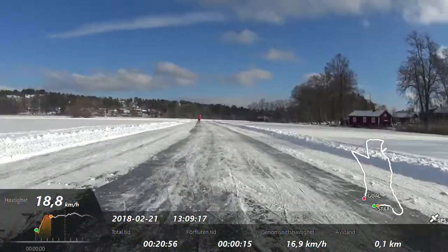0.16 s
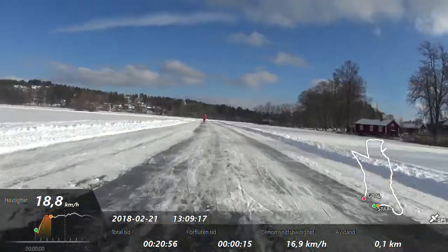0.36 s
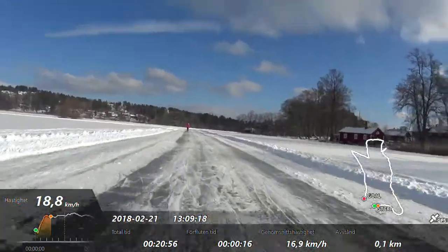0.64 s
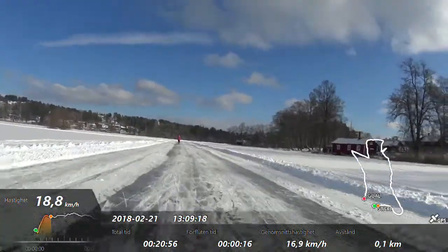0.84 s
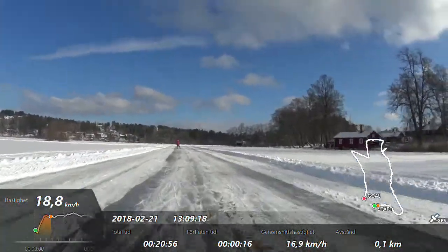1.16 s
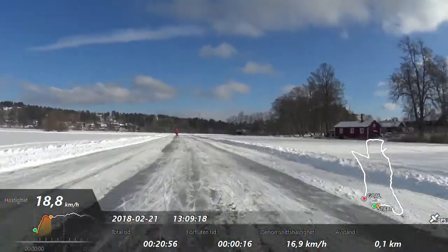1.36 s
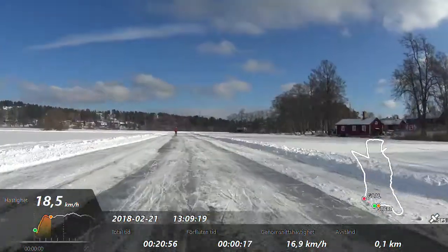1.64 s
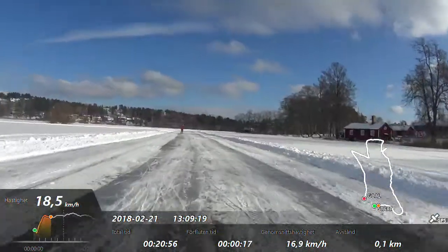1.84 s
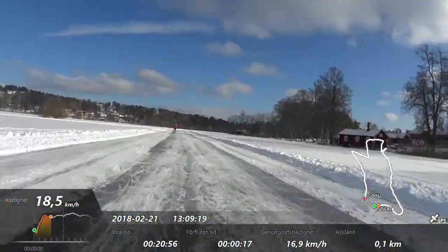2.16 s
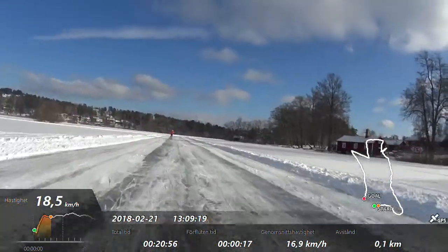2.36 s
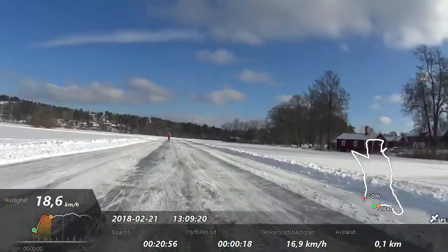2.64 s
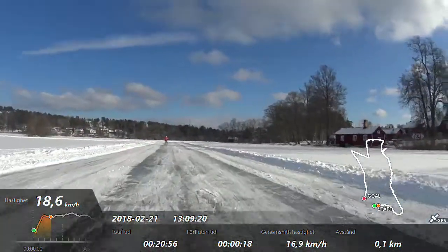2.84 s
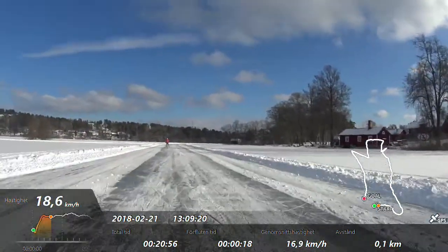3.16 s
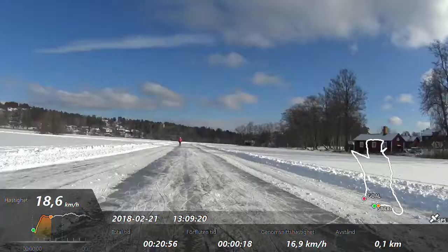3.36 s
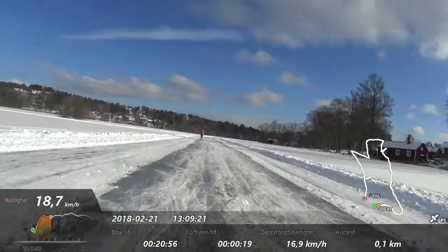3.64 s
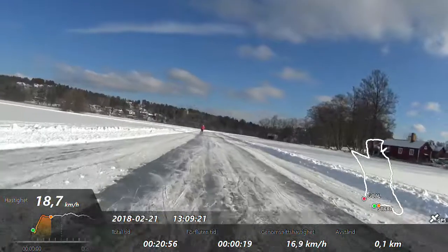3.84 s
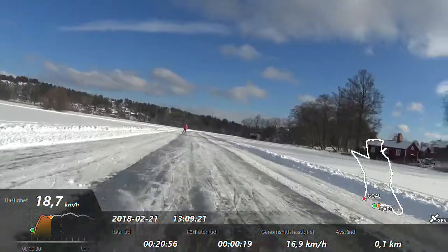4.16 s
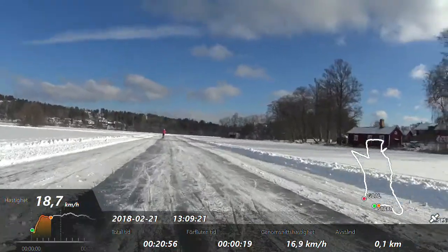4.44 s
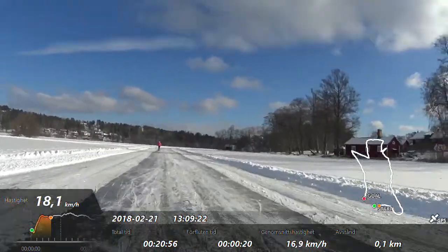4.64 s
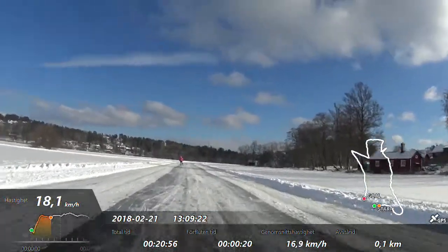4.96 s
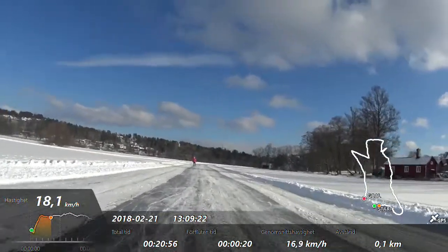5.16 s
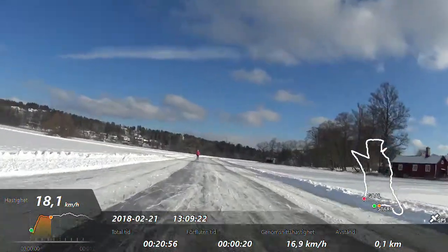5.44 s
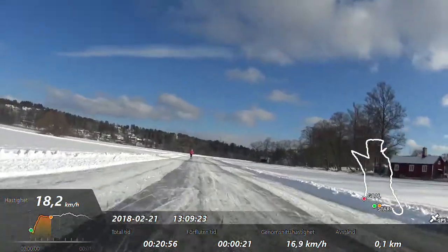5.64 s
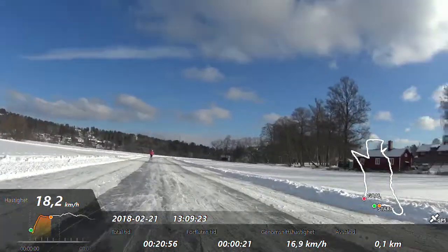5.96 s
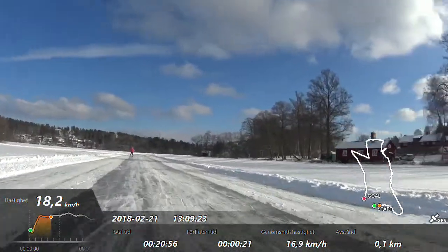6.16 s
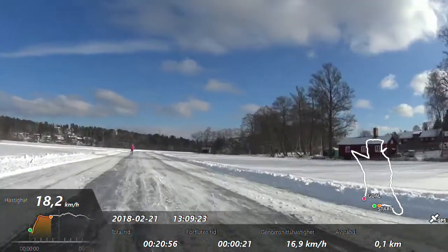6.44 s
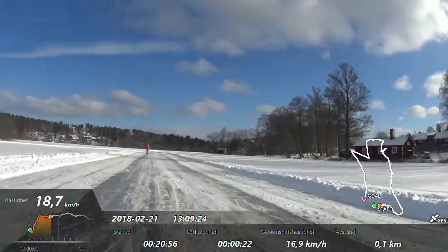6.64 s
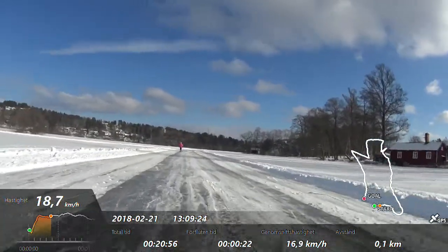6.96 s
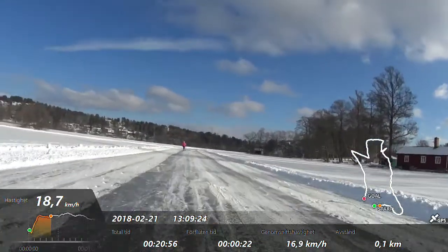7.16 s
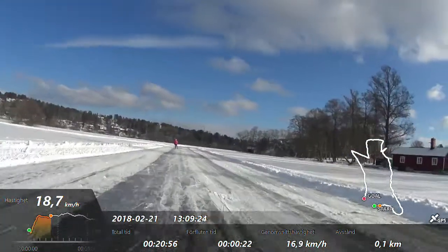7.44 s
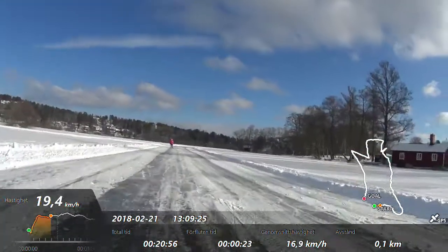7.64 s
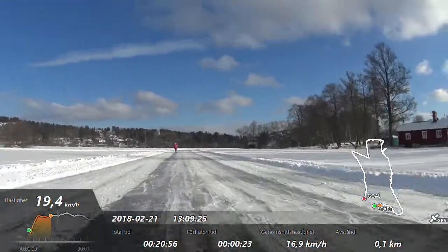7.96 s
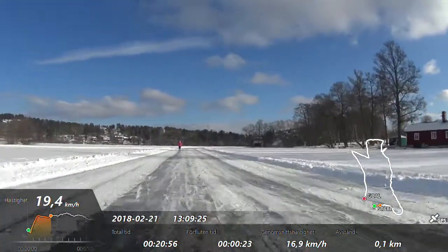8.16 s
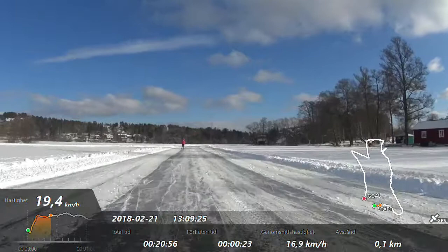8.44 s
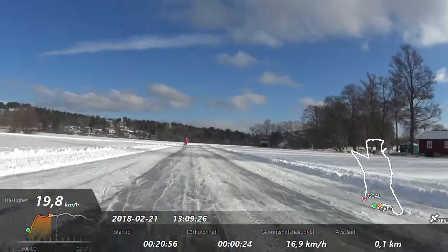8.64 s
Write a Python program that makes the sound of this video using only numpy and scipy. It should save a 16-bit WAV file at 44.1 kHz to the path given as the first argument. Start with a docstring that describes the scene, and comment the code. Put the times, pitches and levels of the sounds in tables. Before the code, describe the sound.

A skater strides steadily across a frozen lake, each blade chattering down, then gliding with a gritty hiss, clacking over ridges in a faint breeze.

```python
"""On a frozen lake, a skater glides at a steady stride with a small camera, one stroke about every 0.85 s.
Each long blade lands with a chatter of shrinking bounces, then hisses in bands of filtered ice clicks.
Rough patches add dense bursts of clicks; ridges give short decaying tones, hollow clunks and noisy chips.
Filtered noise makes the air that buffets two microphone ports, and a limiter flattens the hardest knocks."""
import sys
import numpy as np
from scipy import signal
from scipy.fft import rfft, irfft
from scipy.io import wavfile
from scipy.ndimage import uniform_filter1d, minimum_filter1d

SR = 44100
rng = np.random.default_rng(int(sys.argv[2]) if len(sys.argv) > 2 else 0)


def store_pcm(level_fs):
    """Save levels as 16-bit WAV."""
    pcm = np.round(np.clip(level_fs, -1, 1) * 32767).astype(np.int16)
    wavfile.write(sys.argv[1], SR, np.atleast_2d(pcm).T)


N = 387638
TIME = np.arange(N) / SR
BINS = np.fft.rfftfreq(N, 1 / SR)  # frequencies in Hz

# strokes, left and right skate in turn; the blade chatters until it bears the weight:
# (touch-down [s], chatter length [s], relative chatter level [dB], basic chatter pitch [Hz],
#  extra bite under full weight [dB], treble over body under full weight, before scaling [dB])
STROKES = [(0.201, 0.059, -38, 2350, 3.5, 1.5), (1.03, .13, -26, 2000, 6, -0.5),
           (1.885, 0.051, -27, 2190, 5, 3.5), (2.653, 0.099, -26, 2190, 2.5, -1.5),
           (3.509, 0.047, -29, 2250, 3.5, -2.5), (4.351, 0.082, -24.5, 2100, 3.5, -0.5),
           (5.144, 0.054, -27.5, 2230, 0.5, 0), (6.036, .115, -26.5, 2150, 6.5, -0.5),
           (6.887, 0.056, -29.5, 2220, 3, -1), (7.795, 0.042, -25, 2030, 3, -1.5),
           (8.62, 0.044, -29, 2150, 3, 0.5)]
# colour of ice broken by a scraping blade: (frequency [Hz], relative level per Hz [dB])
SCRAPE = [(150, -12), (500, -9.5), (850, -5.5), (1050, -13), (1350, 1), (1680, 1), (1950, 1), (2250, 6),
          (3100, -6), (4300, -1.5), (5500, -5.5), (6400, -7.5), (7400, -19.5), (11000, -23)]
# colour of air streaming past the camera: (frequency [Hz], relative level per Hz [dB])
WIND = [(15, -3.5), (30, -2.5), (75, 0), (130, -4), (220, -5), (350, -10), (600, -18.5), (1500, -45)]


def gain_of(db):
    """Turns decibels into an amplitude factor."""
    return 10 ** (np.asarray(db) / 20)


def evened(x):
    """Scales a signal to an rms (average strength) of 1."""
    return x / np.sqrt(np.mean(x ** 2) + 1e-20)


def read(points):
    """Reads a table at every frequency bin, in straight lines over log frequency."""
    hz, value = np.transpose(points)
    return np.interp(np.log(BINS + 1), np.log(hz), value)


def coloured(x, spectrum):
    """Filters by a spectrum in dB; white noise keeps its power."""
    return irfft(rfft(x) * evened(gain_of(read(spectrum))), N)


def add(mix, s, sound):
    """Mixes a sound in at time s (seconds)."""
    part = mix[max(round(s * SR), 0):][:len(sound)]
    part += sound[:len(part)]


def wander(rate_hz):
    """Slow random drift of rms 1, with its extremes rounded off."""
    slow = rfft(rng.standard_normal(N)) * np.exp(-(BINS / rate_hz) ** 2)
    return evened(np.tanh(evened(irfft(slow, N)) / 2))


def swell(depth_db, rate_hz):
    """Random rise and fall of loudness, as a gain of rms 1."""
    return evened(gain_of(depth_db * wander(rate_hz)))


def gates(rows, edge, tail):
    """Opens a level curve for each (start s, length s, level dB), with soft edges and a short tail (s)."""
    out = np.zeros(N)
    for s, length, db in rows:
        add(out, s - tail / 2, np.full(max(round(length * SR), 1), gain_of(db)))
    softened = uniform_filter1d(out, max(round(edge * SR), 1))
    keep = np.exp(-1 / (tail * SR))
    return signal.lfilter([1 - keep], [1, -keep], softened)


def fractures(per_s, spread_db):
    """Tiny breaks in the ice: random clicks of uneven size, together of rms 1."""
    size = gain_of(spread_db * np.minimum(rng.exponential(1, N), 4))
    return evened(rng.standard_normal(N) * size * (rng.random(N) < per_s / SR))


def splintered(x, patchy_db):
    """Gives chips of ice their own colours: random patches about 10 ms long and 700 Hz wide."""
    z = signal.stft(x, nperseg=256, noverlap=192)[2]
    patches = uniform_filter1d(rng.standard_normal(z.shape), size=4, axis=0)
    patches = uniform_filter1d(patches, size=7, axis=1)
    z = z * evened(gain_of(patchy_db * evened(patches)))
    return signal.istft(z, nperseg=256, noverlap=192)[1][:N]


def blow(hz, rise, turn):
    """A tone whose envelope swells to 1 at the rise time (s), then dies away; turn is its starting phase."""
    t = np.arange(SR // 40) / SR
    envelope = t / rise * np.exp(1 - t / rise)
    return envelope * np.sin(2 * np.pi * (hz * t + turn))


def bump(rise):
    """The bare envelope of a blow: no tone, just one push."""
    return blow(0, rise, 1 / 4)


def ringing(x, ring_db):
    """Adds the short ring of the blade's resonances to whatever strikes it."""
    # resonances of blade and binding: (pitch [Hz], relative level [dB], time to fall by 60 dB [s])
    blade_modes = [(900, -28, 0.04), (1250, -18, 0.032), (1573, -19, 0.029), (1694, -16.5, 0.03),
                   (2140, -13.5, 0.03), (2360, -14, 0.026), (2670, -20, 0.015), (4450, -31, .014)]
    t = np.arange(SR // 12) / SR
    modes = sum(gain_of(db - 60 * t / t60) * np.cos(2 * np.pi * hz * t) for hz, db, t60 in blade_modes)
    return x + gain_of(ring_db) * signal.oaconvolve(x, modes)[:N]


def swirls(level_db=-51, gust_db=4):
    """Small eddies of air that each port has to itself, as two separate noises."""
    noises = [coloured(rng.standard_normal(N) * swell(gust_db, rate_hz=20), WIND) for _ in range(2)]
    return gain_of(level_db) * np.array(noises)


def wind(level_db=4, gust_db=4.0, buffet_db=-1, push_db=1, push_hz=55):
    """A lumpy rumble of passing air; each strong eddy adds a low push and a burst of noise."""
    # relative strength of the head wind: (time [s], level [dB])
    breeze = [(0.0, -47), (0.83, -43.5), (1.15, -49.5), (1.93, -47), (2.42, -41), (2.71, -46), (6.22, -45),
              (6.93, -47.5), (7.12, -41), (8.79, -47.5)]
    # eddies that hit the microphone: (time [s], length [s], relative level [dB])
    buffets = [(0.218, 0.014, -19), (0.317, 0.025, -23.5), (0.474, 0.011, -28.5), (2.073, 0.034, -31),
               (2.51, 0.0082, -29), (5.446, 0.028, -29), (8.272, 0.0064, -29), (8.687, 0.017, -26.5),
               (8.744, 0.019, -23.5)]
    strength_db = level_db + np.interp(TIME, *np.transpose(breeze))
    steady = gain_of(strength_db) * swell(gust_db, rate_hz=21)
    eddies = gain_of(buffet_db) * gates(buffets, edge=0.0076, tail=0.002)
    pushes = np.zeros(N)
    for (s, _, db), turn in zip(buffets, rng.random(len(buffets))):
        add(pushes, s, gain_of(db + push_db) * blow(push_hz, 0.0025, turn))
    return pushes + coloured(rng.standard_normal(N) * (steady + eddies), WIND)


def weight(s):
    """Share of the skater's weight that presses on the ice around a touch-down at time s."""
    push_s, hold_s, ease_s = 0.17, 0.23, 0.2  # comes on before touch-down, stays, eases into the glide
    coming_on = 1 + (TIME - s) / push_s
    easing_off = 1 - (TIME - s - hold_s) / ease_s
    return np.clip(np.minimum(coming_on, easing_off), 0, 1)


def bite(free_db=-35.5, uneven_db=2.0):
    """How hard the edge bites (dB): it follows the weight of each stroke and wavers on uneven ice."""
    pressed_db = np.max([extra_db * weight(s) for s, _, _, _, extra_db, _ in STROKES], axis=0)
    return free_db + pressed_db + uneven_db * np.tanh(wander(rate_hz=5.3))


def lean(on_edge_db=1.5):
    """Treble over body (dB): it moves from the edge's balance to each stroke's own under the weight."""
    return on_edge_db + sum((flat_db - on_edge_db) * weight(s) for s, _, _, _, _, flat_db in STROKES)


def pebbling(bite_db, level_db=-33, per_s=60, spread_db=4, rise=0.000064, tick_db=-3, tick_rise=0.00021):
    """Many small bumps tap the blade and make it ring, louder when the edge bites."""
    sizes = gain_of(spread_db * np.minimum(rng.exponential(1, N), 3))
    sizes *= rng.random(N) < per_s / SR
    sizes *= gain_of(level_db + bite_db - np.median(bite_db))
    taps, ticks = np.zeros((2, N))
    at = np.flatnonzero(sizes)
    for i, (pitch, turn) in zip(at, rng.standard_normal((len(at), 2))):
        add(taps, i / SR, sizes[i] * blow(1650 * np.exp(.3 * pitch), rise, turn))
        add(ticks, i / SR, sizes[i] * gain_of(tick_db) * bump(tick_rise))
    return ringing(taps, ring_db=-11) + coloured(ticks * rng.standard_normal(N), SCRAPE)


def landing(level_db=1.0, grit_db=3.5, rise=0.0005, sag=0.14, scatter=0.11, uneven_db=6.0,
            boot_db=-8, boot_hz=1150, first_db=7):
    """The blade bounces ever faster; as the weight comes on its pitch sinks and grit and boot join in."""
    # colour of grit thrown up by a landing blade: (frequency [Hz], relative level per Hz [dB])
    grit_colour = [(150, -30), (600, -25), (900, 2), (1100, -9), (1550, -4), (2150, -11.5), (3000, 6.5),
                   (3600, -6.5), (4500, -2.5), (7000, -15.5), (11000, -29)]
    first_gap_s, last_gap_s = .013, 0.0033  # gaps between bounces shrink from the first towards the last
    settle_s = .1  # time scale over which the pitch sinks and the boot grows
    out = np.zeros(N)
    spring = .6 ** np.arange(64)  # bounce left in the blade
    gaps = last_gap_s + (first_gap_s - last_gap_s) * spring
    for s, length, db, hz, _, _ in STROKES:
        chance = rng.standard_normal((len(gaps), 5))
        burst = np.zeros(round(length * SR) + SR // 40)
        for at, height, draws in zip(np.cumsum(gaps) - gaps, spring, chance):
            if at >= length:
                break
            late, size, pitch, boot_pitch, turn = draws
            done, loose = at / settle_s, 1 - height
            steel = blow(hz * np.exp(scatter * pitch - sag * done ** 2), rise, turn)
            boot = done * gain_of(boot_db) * blow(boot_hz * np.exp(.2 * boot_pitch), 0.001, turn)
            # the first bounces are strong and regular, later ones less even
            strength = gain_of(first_db * height + uneven_db * loose * size)
            add(burst, at + 0.236 * last_gap_s * late * loose, strength * (steel + boot))
        loudness = np.sqrt(np.sum(burst ** 2) / (length * SR))
        add(out, s, gain_of(db + level_db) * burst / loudness)
    # grit flies from the end of the first bounce
    grit_rows = [(s + first_gap_s, length - first_gap_s, db) for s, length, db, _, _, _ in STROKES]
    contact = gates(grit_rows, edge=0.0016, tail=0.0019)
    grit = splintered(fractures(per_s=5100, spread_db=4.5), patchy_db=5.0) * contact
    return ringing(out, ring_db=-12.0) + gain_of(grit_db) * coloured(grit, grit_colour)


def gliding(bite_db, smooth_db=-39.0, glide_follow=0.74, glide_db=1.0, glide_rough_db=3.0,
            scrape_rough_db=4.0, body_hz=2900, lean_share=0.96):
    """A light edge hisses in the blade's resonances; a harder bite breaks ice and scrapes."""
    # colour of a gliding blade: (frequency [Hz], relative level per Hz [dB])
    glide_colour = [(300, -12), (500, -24.5), (900, -7), (1100, -9.5), (1400, -5), (1680, 5.5), (1950, -5),
                    (2260, 4.5), (2800, -10), (3500, -9.5), (4450, -4), (5400, -10.5), (7300, -21.5),
                    (11000, -26)]
    hiss_db = np.minimum(bite_db, smooth_db + glide_follow * (bite_db - smooth_db))
    # the power of the bite that the hiss does not use goes into breaking ice
    breaking = np.sqrt(np.maximum(gain_of(2 * bite_db) - gain_of(2 * hiss_db), 0))
    hiss = fractures(per_s=12000, spread_db=-2) * swell(glide_rough_db, rate_hz=48)
    crunch = fractures(per_s=7000, spread_db=0.5) * swell(scrape_rough_db, rate_hz=36)
    sound = coloured(splintered(hiss, patchy_db=-0.5) * gain_of(hiss_db + glide_db), glide_colour)
    sound += coloured(splintered(crunch, patchy_db=5.5) * breaking, SCRAPE)
    # the lean changes the body (the part below body_hz) and leaves the treble alone
    body = irfft(rfft(sound) / (1 + (BINS / body_hz) ** 8), N)
    return sound - body + body * gain_of(-lean_share * lean())


def rasping(level_db=2.0, rough_db=3, grind_rough_db=4):
    """Patches of crust shatter under the blade in dense bursts, with a low grind through the boot."""
    # patches of crust: (time [s], length [s], relative rasp level [dB], level of the low grind [dB])
    crust = [(0.034, 0.091, -27.5, -35), (0.304, 0.027, -25.5, -45.5), (0.371, 0.024, -29.5, -33),
             (0.439, 0.025, -20.5, -40), (0.488, 0.016, -28.5, -22), (0.821, 0.0061, -24, -34.0),
             (0.884, 0.056, -28, -64), (1.12, 0.057, -28, -26), (2.024, 0.017, -24.5, -36),
             (2.056, 0.049, -24.5, -43), (2.13, 0.008, -23.5, -45.5), (2.152, 0.0089, -21, -46.5),
             (2.186, 0.015, -22.5, -64), (2.221, 0.012, -19, -54), (2.863, 0.021, -30.0, -24.5),
             (3.312, 0.098, -31, -32), (3.595, 0.045, -37, -32), (3.662, 0.053, -31.5, -53),
             (3.775, 0.041, -23, -30), (4.067, 0.03, -19, -24), (4.403, 0.025, -28.5, -21),
             (4.466, 0.01, -27, -22.5), (4.484, 0.01, -21, -25), (4.509, 0.063, -24, -23),
             (4.65, 0.02, -29, -45.5), (4.742, 0.013, -24, -28), (5.27, 0.045, -30, -43),
             (5.359, 0.055, -31.5, -39), (5.746, 0.016, -24.5, -42), (5.911, 0.056, -27.5, -41),
             (6.119, 0.037, -42, -29), (6.251, 0.018, -25.5, -32), (6.298, 0.04, -23, -26),
             (6.34, 0.053, -29.5, -37), (7.032, 0.098, -33.5, -30.5), (7.148, 0.031, -28, -42),
             (7.178, 0.019, -22.5, -44), (7.21, 0.022, -24, -42), (7.312, 0.014, -20.5, -44.5),
             (7.355, 0.011, -23, -28), (7.399, 0.012, -28, -50.0), (7.911, 0.076, -22.5, -27)]
    # colour of the low grind of boot and ice: (frequency [Hz], relative level per Hz [dB])
    grind_colour = [(200, -20), (450, -9), (850, -4.5), (1050, -7), (1400, 4.5), (2000, -7), (4000, -25.5)]
    crunch = fractures(per_s=11000, spread_db=0.5) * swell(rough_db, rate_hz=56)
    rasp_rows = [(s, length, db) for s, length, db, _ in crust]
    rasp = splintered(crunch, patchy_db=2.0) * gates(rasp_rows, edge=0.0023, tail=0.0015)
    lumps = fractures(per_s=1700, spread_db=2.0) * swell(grind_rough_db, rate_hz=85)
    grind_rows = [(s, length, db) for s, length, _, db in crust]
    grind = lumps * gates(grind_rows, edge=.004, tail=0.0072)
    return gain_of(level_db) * coloured(rasp, SCRAPE) + coloured(grind, grind_colour)


def knocking(level_db=-0.5, rise=0.00076, clunk_db=5.5, clunk_rise=0.0019, thud_db=-2.0, thud_hz=380,
             chip_db=7, chip_rise=0.0012, snap_db=-6, snap_rise=0.000067, flank_s=0.0045):
    """Each ridge gives the blade a blow and the boot a hollow clunk and thud; the ice snaps and chips."""
    # ridges and cracks, levels relative: (time [s], blow level [dB], blow pitch [Hz],
    # clunk level of boot and ice [dB], clunk pitch [Hz], level of the flying chips [dB])
    ridges = [(0.0944, -11, 1950, -44, 566, -30.5), (0.2204, -17, 2240, -49, 450, -37),
              (0.4368, -11.5, 2200, -33, 743, -19), (0.4903, -30, 2000, -34, 918, -19),
              (0.8076, -22.5, 2540, -32.5, 880, -32.5), (0.8566, -33, 2200, -41, 902, -27),
              (0.9605, -18.5, 1660, -45, 406, -28), (1.161, -9, 1370, -26.5, 810, -46),
              (1.361, -28, 1750, -48, 910, -23), (1.5274, -13, 2300, -36, 912, -25),
              (1.6292, -23, 2200, -39, 401, -48), (1.9892, -8.5, 1710, -36, 584, -32),
              (2.0725, -10.5, 1530, -26, 611, -23), (2.0928, -3.5, 2580, -41, 942, -21),
              (2.2816, -10.5, 1720, -32, 735, -29.5), (2.3447, -18, 2360, -41, 401, -33.5),
              (2.372, -4.5, 1760, -24.5, 690, -25.5), (2.4715, -14.5, 1700, -37, 850, -32),
              (2.557, -19, 1690, -30, 860, -27), (2.583, -20, 2460, -47, 929, -30),
              (2.7681, -5.5, 2180, -27, 800, -39), (2.794, -21, 1600, -28.5, 837, -41),
              (2.819, -14, 1580, -25.5, 657, -31), (2.9118, -8.5, 1810, -38, 627, -34),
              (3.0031, -14, 1610, -32, 880, -49), (3.601, -18, 1600, -22.5, 647, -31),
              (3.6321, -16, 2090, -23.5, 550, -28), (3.698, -11.5, 1720, -28.5, 668, -30),
              (3.7956, -7, 1620, -26, 490, -20.5), (3.8114, -9, 1700, -30, 670, -27),
              (3.823, -7.5, 1630, -38, 439, -26), (3.8485, -13, 1720, -29, 835, -28),
              (3.8602, -10, 1660, -42, 832, -39), (4.0343, -9, 2230, -44, 915, -25.5),
              (4.0512, -13, 1700, -37, 880, -32), (4.0662, -7, 1700, -26, 565, -31),
              (4.0822, -3, 1640, -29, 920, -16), (4.1051, 2.5, 2310, -41, 834, -28),
              (4.1923, -10.5, 1590, -38, 890, -28), (4.2542, -14.5, 1610, -27.5, 600, -33),
              (4.3227, -26, 1530, -47, 904, -31.5), (4.4454, -23, 1710, -31, 940, -33),
              (4.515, -11, 1650, -37, 721, -39), (4.563, -19, 2180, -27.5, 643, -29),
              (4.8145, -20.5, 1710, -35, 931, -34), (4.8584, -12.5, 1430, -29, 860, -36),
              (4.874, -14.5, 2230, -38, 743, -52), (5.2115, -15, 1670, -37, 859, -36),
              (5.217, -4, 2210, -34, 829, -33), (5.428, -11, 1670, -30, 848, -25),
              (5.46, -11.5, 1720, -37, 573, -33), (5.5373, -14.5, 2220, -38.5, 850, -27),
              (5.6212, -13.5, 1570, -24.5, 580, -28), (5.6562, -14.5, 2280, -43, 579, -33.5),
              (5.6806, -0.5, 1680, -44, 759, -47), (5.7663, -16, 2410, -59, 854, -21.5),
              (5.7937, -12, 2170, -60, 947, -20.5), (5.917, -11, 2140, -33, 773, -27),
              (5.9783, -6.5, 1770, -31, 400, -29), (6.3081, -7.5, 1350, -29, 845, -22),
              (6.7278, -15, 1890, -33.5, 390, -37), (6.814, -17, 1490, -34, 890, -29),
              (6.9844, -18, 2110, -26, 656, -33), (7.0232, -19, 1500, -32.5, 563, -36),
              (7.036, -10, 1710, -20.5, 872, -42), (7.0576, -6, 1720, -30, 840, -48),
              (7.1614, -11, 1620, -31, 853, -29.5), (7.3284, -11.5, 1740, -39, 781, -30.5),
              (7.4739, -6.5, 1660, -25.5, 870, -20.5), (7.5014, -8, 1660, -28, 395, -23.5),
              (7.584, -9.5, 1760, -22, 401, -21), (8.0431, -21, 1680, -45, 880, -23.5),
              (8.2146, -18.5, 1600, -26.5, 643, -30), (8.3347, -2.5, 1770, -28, 614, -37),
              (8.3967, -18.5, 1630, -36.5, 870, -35), (8.4311, -20.5, 1680, -28.5, 580, -38),
              (8.546, -23.5, 2070, -35.5, 415, -32.5)]
    rebound_s, rebound_db, rebound_pitch = 0.00256, -8, 0.928  # mean delay, table level offset, pitch ratio
    blows, clunks = np.zeros((2, N))
    # the blade scrapes up one flank of the ridge and down the other
    flanks = [(s - flank_s, 2 * flank_s, high_db) for s, *_, high_db in ridges]
    chips = gates(flanks, edge=0.0094, tail=0.0038)
    for ridge, draws in zip(ridges, rng.random((len(ridges), 4))):
        s, db, hz, low_db, low_hz, high_db = ridge
        turn, low_turn, late, low_pitch = draws
        add(blows, s, gain_of(db + level_db) * blow(hz, rise, turn))
        # the blade drops back onto the ice a moment later, more softly and at a lower pitch
        rebound = gain_of(db + rebound_db) * blow(hz * rebound_pitch, rise, low_turn)
        add(blows, s + rebound_s * (.5 + late), rebound)
        add(clunks, s, gain_of(low_db + clunk_db) * blow(low_hz, clunk_rise, low_turn))
        thud = blow(thud_hz * (0.81 + .5 * low_pitch), 0.0021, low_turn)
        add(clunks, s, gain_of(low_db + thud_db) * thud)
        snap = gain_of(db + snap_db) * bump(snap_rise)
        add(chips, s, gain_of(high_db + chip_db) * bump(chip_rise) + snap)
    ice = coloured(chips * splintered(rng.standard_normal(N), patchy_db=5.0), SCRAPE)
    return ringing(blows, ring_db=-26.0) + clunks + ice


def ports(x, paths_hz=70):
    """Two ports hear one sound with a phase lag; shifting reflections off the skater make them differ."""
    # phase by which the left port leads: (frequency [Hz], phase [radians])
    port_phase = [(20, 0), (120, -.45), (300, -1.05), (600, -1.55), (1100, -1.75), (1900, -1.25),
                  (2300, -1.25), (3000, -.75), (4800, -.45), (6000, 0.44), (11000, 0.66)]
    # left level minus right level: (frequency [Hz], difference [dB])
    port_balance = [(30, 1), (150, -3.5), (1500, -4), (4500, -3.5), (6500, -2), (8500, -1.8), (11000, -1)]
    # how alike the ports are: (frequency [Hz], likeness [0-1])
    port_likeness = [(50, 0.98), (500, 1), (1600, 1), (3000, 0.97), (4500, 0.79), (5600, 0.65),
                     (7200, 0.17), (8500, 0.57), (11000, 0.97)]
    t = np.arange(SR // 100) / SR
    spectrum, stray = rfft(x), np.zeros(N)
    # four fixed random echo paths, whose shares drift while their total power stays level
    shares = np.array([wander(paths_hz) for _ in range(4)])
    shares /= np.sqrt(np.mean(shares ** 2, axis=0))
    paths = rfft(rng.standard_normal((len(shares), len(t))) * np.exp(-t / 0.00089), N)
    paths /= np.sqrt(np.sum(abs(paths) ** 2, axis=0))
    for share, path in zip(shares, paths):
        stray += share * irfft(spectrum * path, N)
    like = np.clip(read(port_likeness), 0, 1)
    common = np.sqrt((1 + like) / 2) * spectrum
    apart = np.sqrt((1 - like) / 2) * rfft(stray)
    left = np.exp(.5j * read(port_phase)) * gain_of(read(port_balance) / 2)
    right = 1 / left
    both = np.array([left * (common + apart), right * (common - apart)])
    return irfft(both / abs((left + right) / 2), N)  # the sum of the two keeps the common level


def scene():
    """Blades on ice and wind, at the two ports."""
    bite_db = bite()
    air = wind()
    blades = pebbling(bite_db) + landing() + gliding(bite_db) + rasping() + knocking()
    return ports(air + blades) + swirls()


def record(dry, ceiling_db=-4.5, recover_db_per_s=260, makeup_db=-0.28, edge_hz=11150):
    """The housing colours the treble, a fast limiter holds the peaks down, then the top is cut off."""
    # treble colour of the microphone housing: (frequency [Hz], level [dB])
    housing = [(6500, -1.5), (7600, 0), (8400, 6), (9000, 3), (9450, 3.5), (10200, -5), (10850, 5),
               (11300, -9.5)]
    x = gain_of(makeup_db) * irfft(rfft(dry) * gain_of(read(housing)), N)
    # the louder port sets the peak level, which then falls at a steady rate
    peak_db = -minimum_filter1d(-20 * np.log10(abs(x).max(0) + 1e-9), size=41)
    fall = TIME * recover_db_per_s
    held_peak_db = np.maximum.accumulate(peak_db + fall) - fall
    over_db = np.maximum(held_peak_db - ceiling_db, 0)
    limited = x / gain_of(uniform_filter1d(over_db, size=31))
    low_pass = signal.firwin(511, edge_hz, window=("kaiser", 9), fs=SR)
    return signal.oaconvolve(limited, low_pass[None], "same")


dry = scene()
out = record(dry)
store_pcm(out)
```